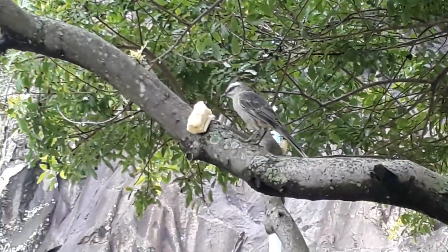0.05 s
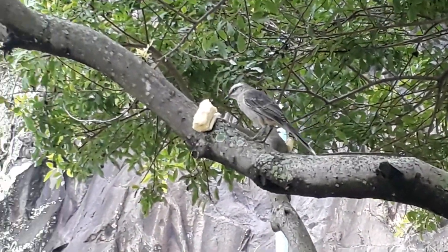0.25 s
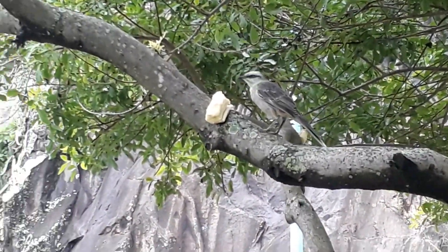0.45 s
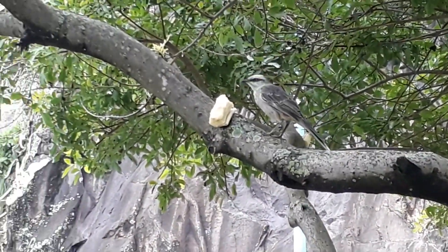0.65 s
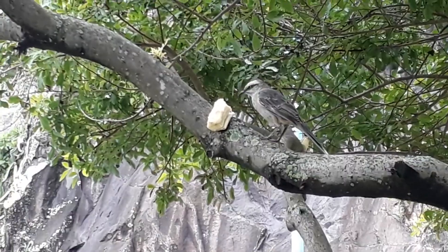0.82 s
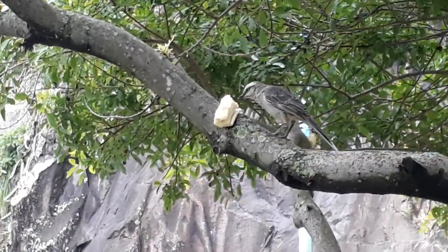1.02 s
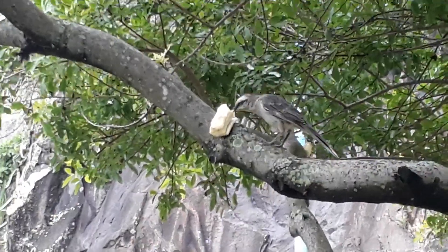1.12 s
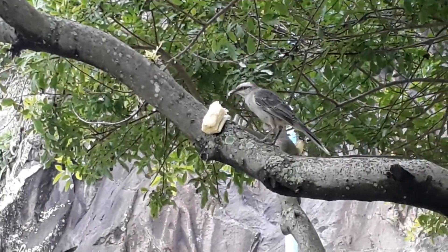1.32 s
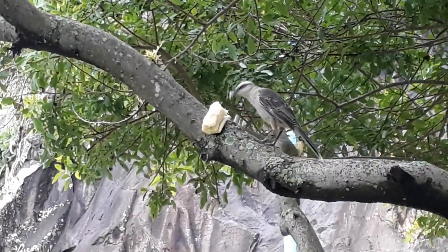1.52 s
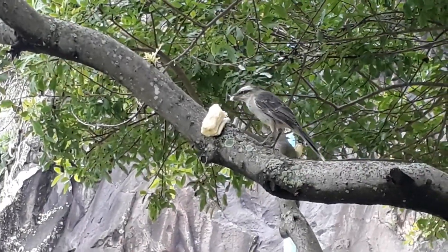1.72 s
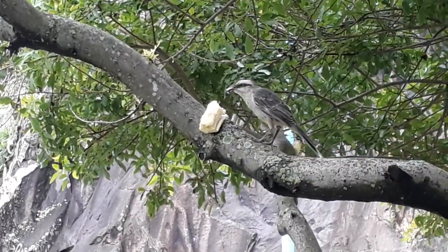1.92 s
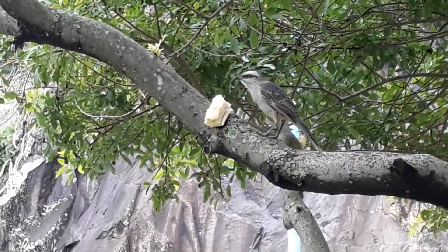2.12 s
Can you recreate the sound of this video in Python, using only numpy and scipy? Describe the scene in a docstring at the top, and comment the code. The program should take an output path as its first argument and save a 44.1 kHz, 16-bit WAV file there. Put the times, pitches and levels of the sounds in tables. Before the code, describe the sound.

Birdsong among trees: a falling whistle, rising buzz and two quick trills, then a close knock.

```python
"""A songbird among trees by a rock face: a long down-slur and its echo, a rising buzz, two quick trills.
Its notes are nearly pure gliding whistles, echoing off branches and rock. Birds farther off chirp
in between, over a low distant rumble and an airy hiss. Close to the microphone come a light tap,
a bird's sharp chip and one dry knock; tap and knock are bodies ringing briefly from a blow."""
import sys
import numpy as np
from scipy import signal
from scipy.fft import rfft, irfft, next_fast_len
from scipy.io import wavfile
from scipy.ndimage import uniform_filter1d, map_coordinates

SR = 44100
rng = np.random.default_rng(int(sys.argv[2]) if len(sys.argv) > 2 else 0)


def log_audio(samples):
    """Write samples as a 16-bit WAV file to the path given in sys.argv[1]."""
    # one column per channel
    frames = np.atleast_2d(samples).T
    # limit to full scale, then quantise
    limited = np.clip(frames, -1, 1)
    pcm = np.round(limited * 32767).astype(np.int16)
    wavfile.write(sys.argv[1], SR, pcm)


N = 94815
T = np.arange(N) / SR

# spectra of the outdoor air and the high hiss: f/Hz, relative level/dB
AIR_SPECTRUM = [(25, -21), (45, -20.5), (65, -4.5), (130, 0), (210, -5.5), (330, -11), (600, -14.5),
                (1000, -14), (1400, -17), (2100, -16.5), (3000, -20.5), (4200, -25), (6800, -20),
                (9000, -36), (15000, -43.5)]
HISS_SPECTRUM = [(2500, -23), (4300, -10), (5200, -2), (7000, -1.5), (8700, -7.5), (9600, -18.5),
                 (11000, -12.5), (13000, -23), (15500, -25)]
# their loudness over time: t/s, level/dB
AIR_LEVEL = [(0, -51.5), (.42, -48), (.8, -50), (1.3, -48.5), (1.7, -49.5), (2.15, -51)]
HISS_LEVEL = [(0, -53.5), (.09, -52), (.2, -53.5), (.33, -48.5), (.4, -51.5), (.47, -46), (.58, -56.5),
              (.72, -69), (2.15, -89)]
# short high whistles, and brief rock echoes of the slur and second trill:
# t/s, length/s, start, middle and end f/Hz, level/dB
WHISTLES_AND_ECHOES = [(.205, 0.079, 7050, 6730, 4710, -53), (.235, 0.054, 7750, 7350, 5830, -61),
                       (.36, 0.053, 6900, 6230, 5300, -57), (.418, 0.024, 7800, 7500, 7000, -50.5),
                       (.583, 0.011, 6260, 6210, 6000, -52), (.826, .052, 7400, 5760, 4900, -56),
                       (.95, 0.02, 7800, 7510, 6400, -51.5), (1.241, .036, 7500, 6070, 5300, -54.5),
                       (1.376, 0.0092, 7720, 7440, 7200, -50.5), (1.416, 0.02, 7530, 7590, 6900, -55),
                       (1.435, 0.031, 6950, 5890, 5180, -53), (1.611, 0.015, 2803, 2940, 3050, -58),
                       (1.692, .028, 3050, 2900, 2550, -69)]
# chirps of birds farther off: t/s, length/s, start, middle and end f/Hz, level/dB
FAR_CHIRPS = [(.67, 0.076, 2050, 2440, 2570, -57.5), (1.627, 0.057, 1630, 1897, 1650, -52),
              (1.861, 0.024, 5100, 5100, 5000, -56), (1.884, .034, 5050, 4850, 4050, -62),
              (1.942, 0.024, 5000, 5270, 5200, -57), (1.955, 0.0396, 3600, 4210, 4350, -59.5),
              (2.066, 0.03, 3200, 3230, 3230, -60.5), (2.097, .028, 3200, 3380, 3450, -58)]
# paths of the down-slur and of its rock echo, led by a thin high note: t/s, f/Hz, level/dB
SLUR_AND_ECHO = [
    [(.444, 5600, -45), (.457, 6200, -42.5), (.474, 7000, -41), (.492, 6250, -38), (.505, 5100, -41),
     (.531, 3850, -44), (.551, 3250, -48), (.576, 2920, -48.5)],
    [(.531, 7600, -57), (.547, 8050, -51), (.58, 7750, -56.5), (.612, 6950, -49.5), (.634, 5200, -51),
     (.649, 4650, -67), (.661, 4000, -48), (.68, 3350, -54), (.707, 2870, -53)],
]
# path of the rising buzz: t/s, f/Hz, level/dB
BUZZ_PATH = [(.768, 3000, -49.5), (.82, 3390, -47), (.865, 3770, -52), (.89, 4315, -44.5),
             (.911, 4570, -43.5), (.935, 4470, -41.5)]
# syllables of the first trill (whip) and the second (chew): t/s, level/dB
WHIP_SYLLABLES = [(.960, -38), (1.052, -37), (1.144, -35.5)]
CHEW_SYLLABLES = [(1.241, -43), (1.313, -44.5), (1.387, -42), (1.464, -42), (1.543, -44.5)]
# strokes of a syllable: delay/s, length/s, start, middle and end f/Hz, relative level/dB, peak place/0-1
WHIP_STROKES = [(0, .024, 6010, 4900, 3000, -6.5, 0.73), (.033, .032, 2983, 3238, 3970, -1, 0.82)]
CHEW_STROKES = [(0, .018, 2212, 2453, 3000, -9.5, 0.43), (.018, .036, 3457, 2664, 2105, -4.5, 0.25)]
# close chip: t/s, length/s, start, middle and end f/Hz, level/dB, peak place/0-1, octave overtone/dB
CHIP_SWEEPS = [(1.724, 0.0122, 7100, 6850, 7600, -39, 0.67, -29),
               (1.715, 0.02, 4400, 6050, 6750, -47.5, .7, -5),
               (1.708, .032, 7500, 6200, 5250, -50.5, 0.55, -35)]
# resonances of the two struck bodies: f/Hz, relative level/dB
TAP_SPECTRUM = [(100, -20), (330, 2.5), (650, -13), (1100, 0), (1700, -9), (2350, 0.5), (3500, -15),
                (12000, -39)]
KNOCK_SPECTRUM = [(30, -37), (70, -18), (145, 0.5), (230, -0.5), (330, -7), (540, 0), (1000, -4.5),
                  (1300, -13), (1850, -9.5), (2700, -17), (4100, -29.5), (5800, -38), (7000, -32),
                  (15000, -49)]
# echo of trees and rock: f/Hz, t60/s
ECHO_DECAY = [(2000, 0.68), (3500, 0.66), (7000, 0.75), (12000, 0.34)]


def amp(db):
    """Decibels to gain."""
    return 10 ** (np.asarray(db) / 20)


def along(points, hz):
    """Read (f/Hz, value) points on a log frequency axis."""
    freqs, values = np.transpose(points)
    return np.interp(np.log(hz + 1), np.log(freqs + 1), values)


def curves(rows):
    """One value per sample for each column after the time."""
    times, *columns = np.transpose(rows)
    return [np.interp(T, times, column) for column in columns]


def wobble(rate):
    """A smooth random curve, rate knots a second."""
    return map_coordinates(rng.standard_normal(4096), [T * rate], mode="wrap")


def filtered(x, response):
    """Shape x by a gain that depends on frequency."""
    size = next_fast_len(N + SR // 2)
    return irfft(rfft(x, size) * response(np.fft.rfftfreq(size, 1 / SR)), size)[..., :N]


def noise(spectrum):
    """Coloured noise of rms 1."""
    x = filtered(rng.standard_normal(N), lambda hz: amp(along(spectrum, hz)))
    return x / np.sqrt(np.mean(x ** 2))


def outdoor_air(rumble_hz=260, swing_db=2.5):
    """Open air all round, its low distant rumble swelling unevenly."""
    air = noise(AIR_SPECTRUM)
    rumble = filtered(air, lambda hz: np.exp(-(hz / rumble_hz) ** 2))
    swell = amp(swing_db * wobble(14))
    return amp(curves(AIR_LEVEL)[0]) * (air + rumble * (swell - 1))


def hiss():
    """A high hiss that dies away within the first second."""
    return amp(curves(HISS_LEVEL)[0]) * noise(HISS_SPECTRUM)


def whistle(hz, gain, octave_db=-40, third_db=-35.5, waver_hz=25, waver_db=2.5):
    """A bird's slightly wavering tone with its second and third harmonics."""
    phase = 2 * np.pi * np.cumsum(hz + waver_hz * wobble(300)) / SR
    overtones = sum(amp(db) * np.sin(k * phase) * (k * hz < SR / 2)
                    for k, db in [(2, octave_db), (3, third_db)])
    return np.sqrt(2) * gain * amp(waver_db * wobble(170)) * (np.sin(phase) + overtones)


def glide(onset, length, start_hz, middle_hz, end_hz, db, peak=0.49):
    """Pitch and gain of one note: a bent sweep that swells and fades."""
    progress = np.clip((T - onset) / length, 0, 1)
    bend = 2 * (2 * middle_hz - start_hz - end_hz) * progress * (1 - progress)
    hz = start_hz + (end_hz - start_hz) * progress + bend
    swell = np.sin(np.pi / 2 * np.interp(progress, [0, peak, 1], [0, 1, 0]))
    return hz, amp(db) * swell ** np.where(progress < peak, 1.11, 0.91)


def woods(direct, send_db, build_s=0.023, early_s=0.016, early_db=-1.5):
    """The direct sound, scatter from near branches and a diffuse tail off trees and rock."""
    hz, t, bands = signal.stft(rng.standard_normal(SR), SR, nperseg=256)
    decay = amp(-60 * t / along(ECHO_DECAY, hz)[:, None])
    build = 1 - np.exp(-t / build_s)
    tail = signal.istft(bands * decay * build, SR, nperseg=256)[1][:SR]
    early = rng.standard_normal(SR) * np.exp(-T[:SR] / early_s)
    echo = tail / np.linalg.norm(tail) + amp(early_db) * early / np.linalg.norm(early)
    return direct + amp(send_db) * signal.fftconvolve(direct, echo)[:N]


def short_tones(rows, send_db):
    """Brief gliding tones among the trees: whistles, chirps or their echoes."""
    return woods(sum(whistle(*glide(*row)) for row in rows), send_db)


def contour(path, fade_s=0.0032):
    """Pitch and gain of a long note that follows a path."""
    hz, db = curves(path)
    gate = np.clip(np.minimum(T - path[0][0], path[-1][0] - T) / fade_s, 0, 1)
    return uniform_filter1d(hz, size=400), amp(db) * gate


def slur():
    """One whistle arches up and slides down; its echo off the rock follows, led by a thin high note."""
    return woods(sum(whistle(*contour(path)) for path in SLUR_AND_ECHO), send_db=-4)


def buzz(flutter_hz=76, swing_hz=110, depth_db=8.5):
    """A rising note that flutters in pitch and strength."""
    hz, gain = contour(BUZZ_PATH)
    flutter = np.sin(2 * np.pi * flutter_hz * T)
    dips = amp(depth_db * (flutter - 1) / 2)
    return woods(whistle(hz + swing_hz * flutter, gain * dips), send_db=-4)


def trill(syllables, strokes, send_db):
    """One syllable of two whistled strokes, repeated quickly."""
    voice = np.zeros(N)
    for onset, db in syllables:
        for delay, length, *pitches, stroke_db, peak in strokes:
            voice += whistle(*glide(onset + delay, length, *pitches, db + stroke_db, peak))
    return woods(voice, send_db)


def blow(at_s):
    """A single push, one sample long."""
    return signal.unit_impulse(N, round(at_s * SR))


def struck(force, spectrum, size=4096):
    """A body rings under a force; a single blow peaks at 1."""
    cepstrum = irfft(np.log(amp(along(spectrum, np.fft.rfftfreq(size, 1 / SR)))))
    # minimum phase: the ring starts with the blow
    cepstrum[1:size // 2] *= 2
    cepstrum[size // 2 + 1:] = 0
    ring = irfft(np.exp(rfft(cepstrum)))
    return signal.fftconvolve(force, ring / np.abs(ring).max())[:N]


def tap(at_s=1.3926, rattle_db=-14, rattle_t60_s=0.021):
    """A light blow with a short rattle, close to the microphone."""
    envelope = amp(rattle_db - 60 * np.abs(T - at_s) / rattle_t60_s) * (T > at_s)
    rattle = envelope * rng.standard_normal(N)
    return amp(-28.5) * struck(blow(at_s) + rattle, TAP_SPECTRUM)


def chip():
    """A bird near the microphone: both sides of its voice sweep at once and cross."""
    voice = sum(whistle(*glide(*sweep), octave_db) for *sweep, octave_db in CHIP_SWEEPS)
    return woods(voice, send_db=-16)


def knock(at_s=1.8521):
    """One dull blow close to the microphone, with no echo."""
    return -amp(-9) * struck(blow(at_s), KNOCK_SPECTRUM)


def scene():
    """One spot among the trees; everything reaches both channels alike."""
    song = slur() + buzz()
    song += trill(WHIP_SYLLABLES, WHIP_STROKES, send_db=-4)
    song += trill(CHEW_SYLLABLES, CHEW_STROKES, send_db=-1.5)
    song += short_tones(WHISTLES_AND_ECHOES, send_db=1)
    far_birds = short_tones(FAR_CHIRPS, send_db=-6)
    close_by = chip() + tap() + knock()
    mono = song + far_birds + close_by + outdoor_air() + hiss()
    return np.array([mono, mono])


def record(dry, top_hz=15600):
    """The recorder keeps nothing above its band limit."""
    return filtered(dry, lambda hz: hz < top_hz)


dry = scene()
out = record(dry)
log_audio(out)
```